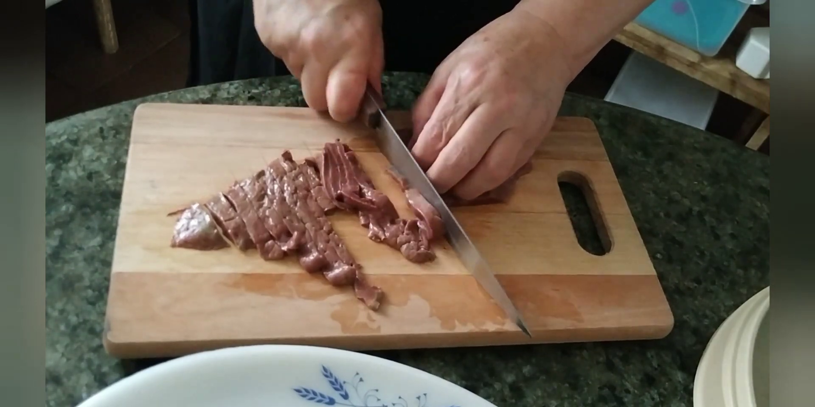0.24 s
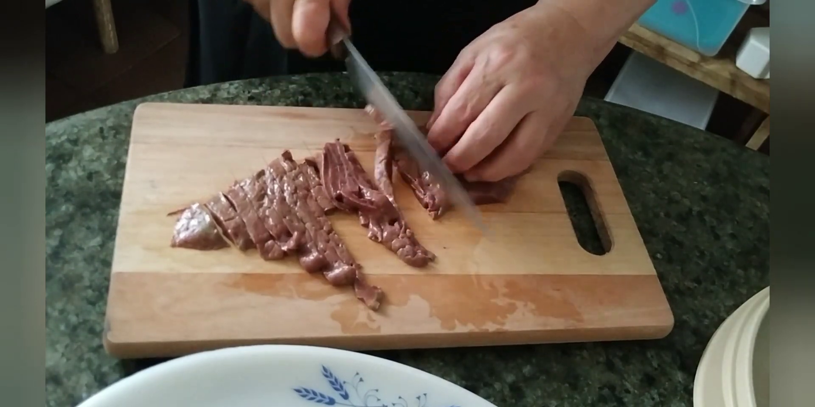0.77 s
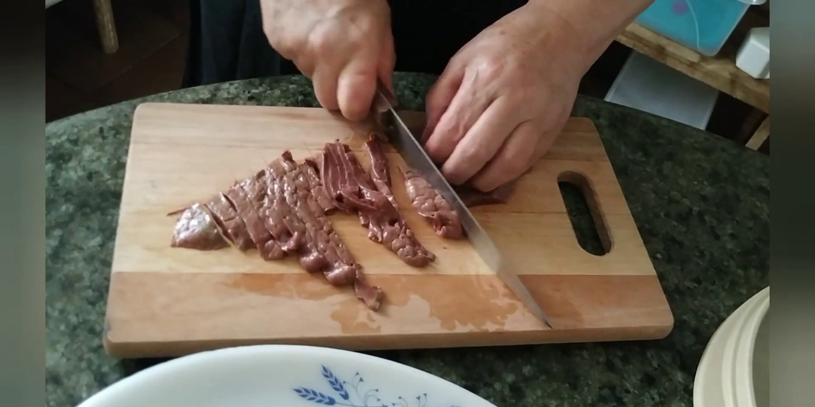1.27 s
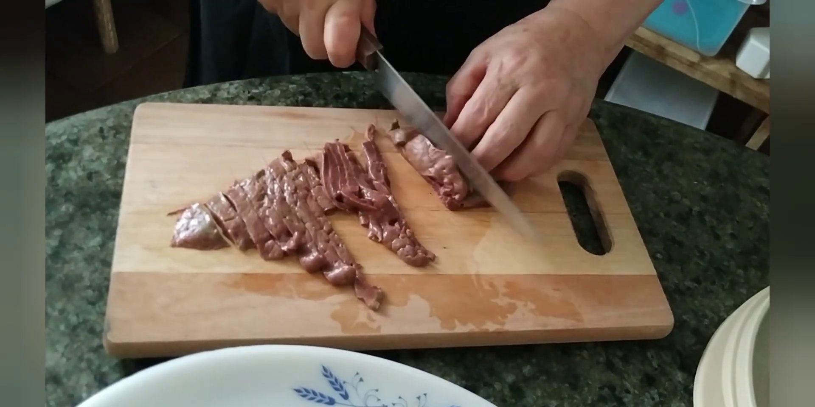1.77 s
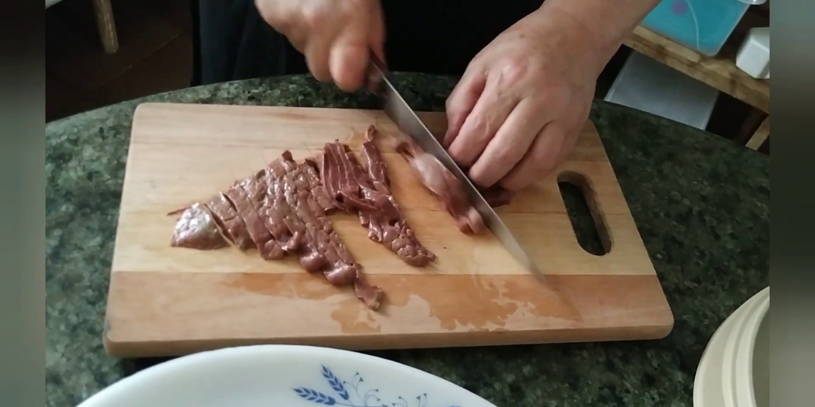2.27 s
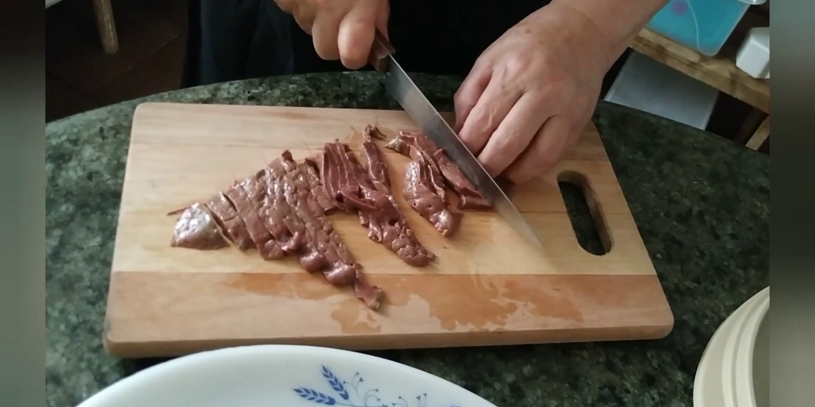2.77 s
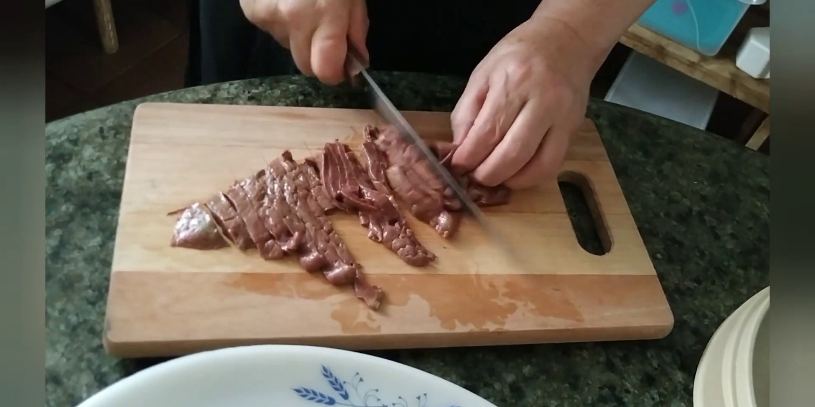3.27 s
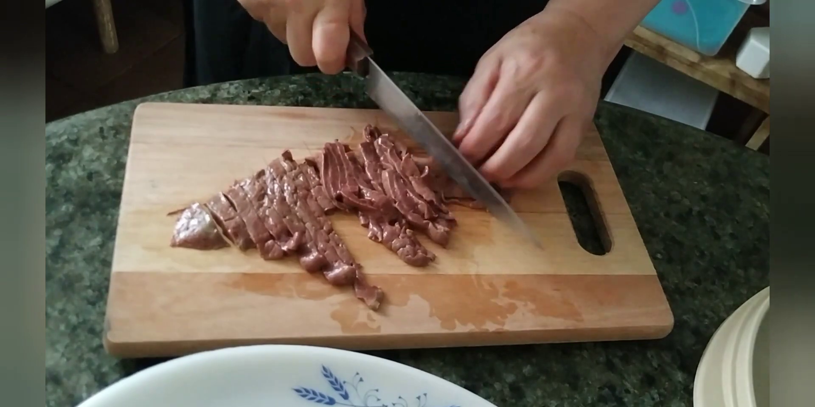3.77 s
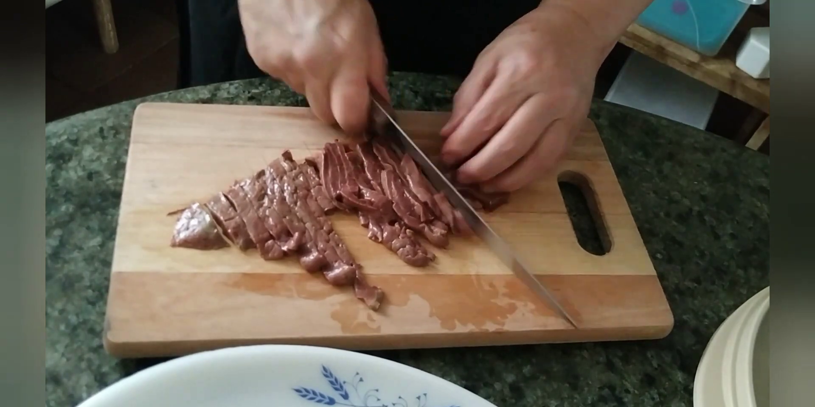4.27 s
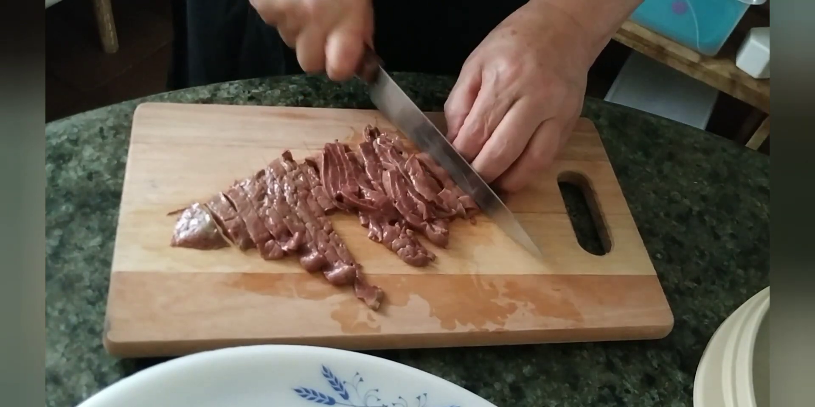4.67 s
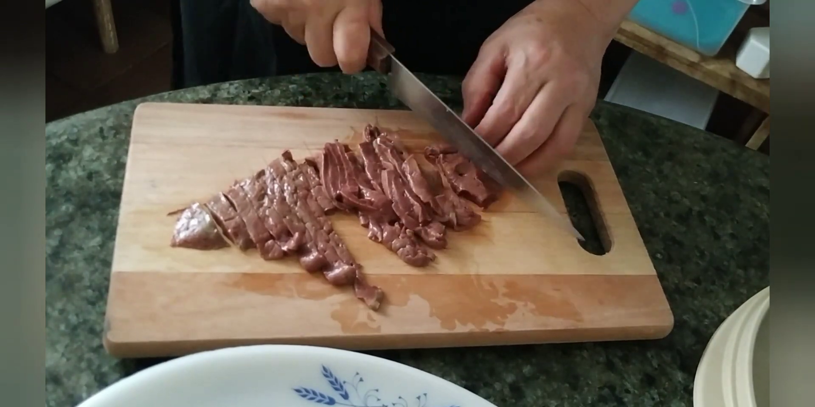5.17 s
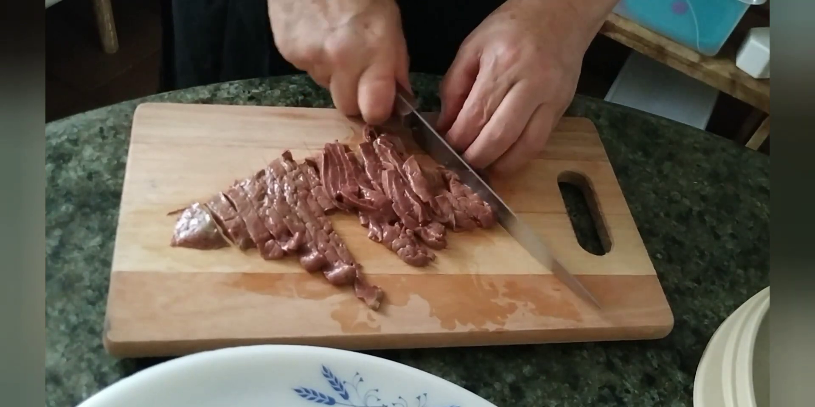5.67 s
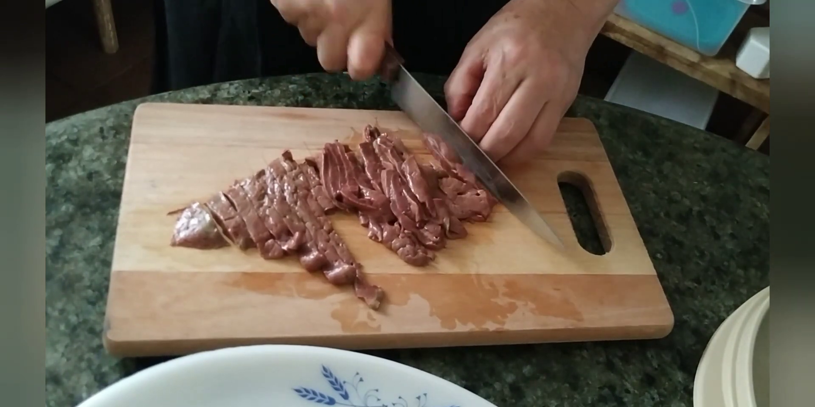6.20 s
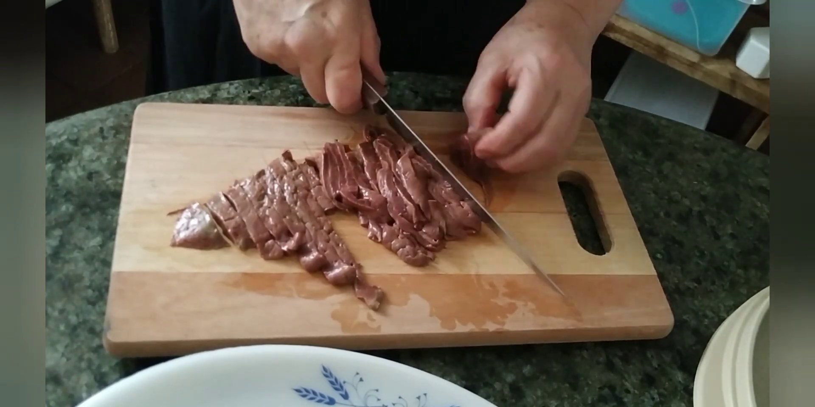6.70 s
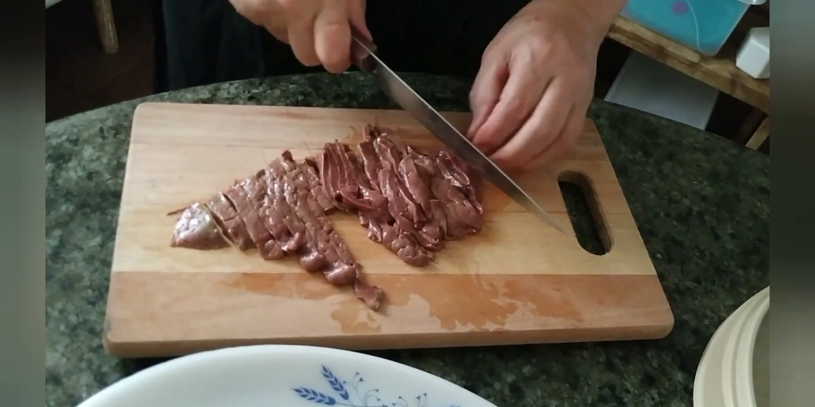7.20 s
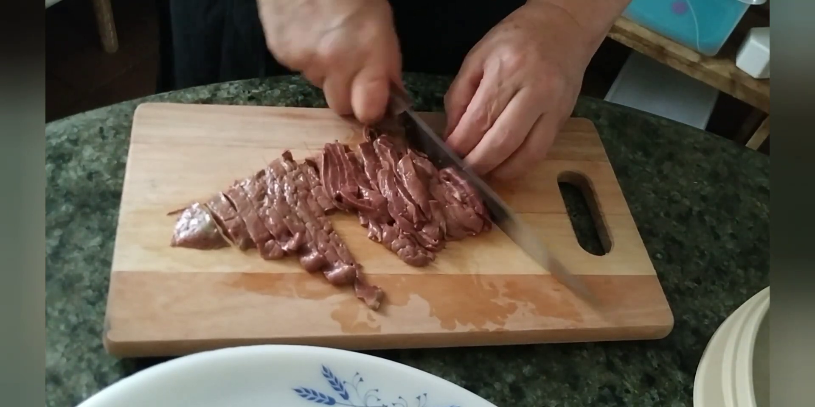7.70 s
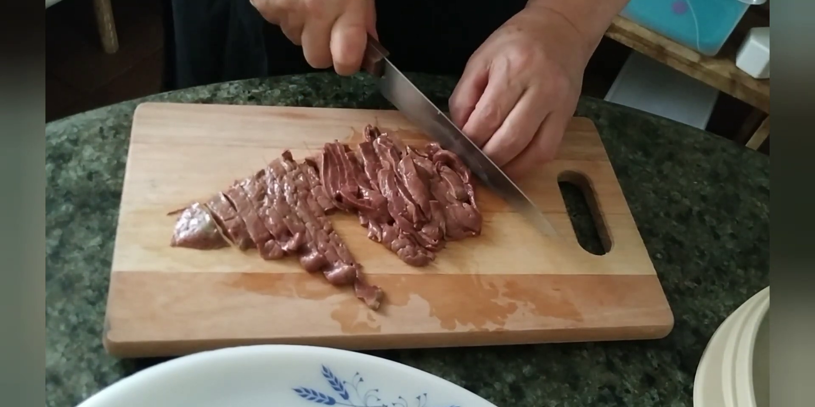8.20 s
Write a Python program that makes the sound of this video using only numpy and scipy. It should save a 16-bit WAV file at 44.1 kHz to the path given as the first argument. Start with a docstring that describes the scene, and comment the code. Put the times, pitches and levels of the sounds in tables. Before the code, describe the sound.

Irregular slicing, about three strokes a second, heard from half a metre: hissing metal edge, coarse rubbing on wood, dull cushioned thuds with a low table shudder. A clear knock comes about one second in, a louder one past the middle, and another crisp one at the end. Small wet clicks dot the gaps. Short dull kitchen reverberation, wavering appliance hum and soft background hiss surround it.

```python
"""Slicing meat on a wooden board

A kitchen knife slices raw meat on a wooden board lying on a stone table, half a metre below a phone.
The sliding edge sheds noisy hiss and its coarse catches grind through the board's modes; the blade knocks
the board or lands softly, and the table shudders on its own modes; short bright ticks and soft rustles are noise.
A small hard kitchen answers by convolution, over an appliance's wavering tones, rumble and faint hiss."""
import sys
import numpy as np
from scipy import signal
from scipy.fft import rfft, irfft, next_fast_len
from scipy.io import wavfile
from scipy.ndimage import uniform_filter1d

SR = 44100
rng = np.random.default_rng(int(sys.argv[2]) if len(sys.argv) > 2 else 0)


def decibels_to_gain(level_db):
    """Convert a level in decibels to a linear amplitude gain (20 dB per decade)."""
    exponent = np.asarray(level_db, float) / 20
    return 10 ** exponent


def put_to_file(sound):
    """Save the sound as 16-bit audio at rate SR, in the file named by the first command-line argument."""
    columns = np.atleast_2d(sound).T  # one column per channel
    safe = np.clip(columns, -1, 1)
    whole_steps = np.round(safe * 32767)
    wavfile.write(sys.argv[1], SR, whole_steps.astype(np.int16))


N = 372644
TIME = np.arange(N) / SR

# All levels are relative unless a function scales its signal to rms 1 first.
# blade on board: start_s, blow_db, contact_ms, edge_tick_db, table_shudder_db
KNOCKS = [(0.937, -19.5, 1.0, -30, -50), (1.8585, -32, 0.6, -23, -50.5), (2.692, -41, 0.5, -33, -80),
          (4.539, -12.3, 0.7, -26, -56), (5.311, -44, 0.4, -46, -70), (5.328, -42, 0.3, -43, -59),
          (6.338, -44, 0.5, -35, -61), (7.369, -30, 0.55, -34, -67), (8.163, -43, 0.3, -35, -66),
          (8.185, -15.3, 0.24, -21, -55)]
# blade landing softly through the meat: start_s, level_db, rise_ms, cushion_corner_hz, table_shudder_db
LANDINGS = [(0.086, -74, 3.8, 1200, -58.5), (0.327, -44.5, 33.5, 513, -65), (0.885, -57.5, 56, 700, -80),
            (1.336, -61, 16.5, 596, -65), (1.800, -52.5, 56, 980, -68), (2.215, -51.5, 24.5, 525, -62),
            (2.640, -55, 59, 710, -83), (2.685, -41.5, 4.4, 690, -52.5), (3.060, -56, 19, 544, -75),
            (3.818, -54, 17, 840, -60), (4.083, -70.5, 11, 1400, -61), (4.51, -59, 23, 940, -63.5),
            (4.772, -51, 7, 720, -80.5), (5.270, -55.5, 59, 1050, -71), (5.530, -55.5, 22.3, 903, -67),
            (5.995, -62, 25, 910, -58), (6.030, -52.5, 48, 885, -50.5), (6.320, -50.5, 19, 926, -76.5),
            (6.766, -73, 7.2, 1300, -55.5), (6.793, -71.5, 10, 1300, -64), (7.303, -50.5, 69, 920, -53),
            (7.558, -69.5, 2.3, 2010, -56), (7.603, -71, 5.8, 1190, -68), (8.135, -61, 8, 1000, -56.5)]
# short bright ticks, wet meat letting go or small contacts of the blade: start_s, level_db, lowest_hz
TICKS = [(0.085, -37, 900), (0.5103, -40, 8000), (1.7345, -33, 1870), (2.534, -38.5, 4330),
         (3.705, -38.5, 9180), (4.318, -40, 6100), (5.8835, -45, 6780), (7.559, -40, 900),
         (7.651, -37, 3800), (8.410, -44, 3000)]
# fingers shifting on the wet meat: centre_s, length_s, level_db, centre_hz
RUSTLES = [(5.02, 0.084, -63, 3700), (5.18, 0.09, -62, 3600), (5.71, 0.1, -55, 3870)]
# each slide of the edge: fastest_s, speeding_up_s, slowing_down_s, hiss_db, grind_db, tilt_db_per_octave
STROKES = [(0.005, 0.044, 0.074, -56, -67, -0.5), (0.19, 0.111, 0.14, -54, -56.5, 1.5),
           (0.363, 0.046, 0.066, -48.5, -50, -0.6), (0.947, 0.098, 0.19, -50, -53.5, 0.4),
           (1.23, 0.089, 0.11, -55, -55.5, 1.5), (1.364, 0.03, 0.056, -50, -60, 1.5),
           (1.86, 0.063, 0.11, -42.5, -77, -0.3), (2.1, 0.095, 0.12, -76, -63, 4),
           (2.24, 0.21, 0.11, -54.5, -61.5, 1.5), (2.697, 0.059, 0.16, -47.5, -52, 0.3),
           (2.971, 0.083, 0.14, -51, -53, 1.5), (3.101, 0.059, 0.092, -47, -54.5, 2.3),
           (3.852, 0.058, 0.12, -48.5, -50.5, -1.7), (3.97, 0.1, 0.11, -56.5, -56.5, 3),
           (4.095, 0.01, 0.05, -57, -76, 1), (4.55, 0.04, 0.2, -49, -64, -0.2),
           (4.787, 0.018, 0.041, -45.5, -47, -0.5), (5.334, 0.091, 0.15, -48, -61, -0.6),
           (5.554, 0.021, 0.041, -50.5, -57, -1), (6.08, 0.096, 0.13, -46.5, -59.5, -0.8),
           (6.343, 0.046, 0.08, -50, -48, -1), (6.8, 0.054, 0.047, -61.5, -86, -3),
           (7.368, 0.077, 0.14, -45, -66, -0.6), (7.609, 0.019, 0.043, -56, -73, 0),
           (8.18, 0.06, 0.1, -46, -54, -0.1), (8.414, 0.005, 0.045, -47.5, -62.5, 0.8)]
# modes of the board: pitch_hz, level_db, t60_s
BOARD_MODES = [(325, -26, .2), (380, -19, .05), (585, -20, .06), (640, -13, .07), (830, -17, .09),
               (720, -17, .05), (1040, -17, .05), (1215, -17, .05), (1600, -17, .04), (1780, -16, .03),
               (850, 7, .012), (1550, 4.5, .009), (2250, 0, .005)]
# how well the board radiates: frequency_hz, gain_db
RADIATION = [(100, -37.5), (280, -41.5), (330, 1), (480, -5.5), (620, 4.5), (2450, 8), (2900, -1.5)]
# modes of the table on its legs: pitch_hz, level_db, t60_s
TABLE_MODES = [(46.47, 9, 0.72), (115, 5.5, 0.047), (146, 7, 0.14)]
# spectrum of the edge: frequency_hz, density_db (per Hz)
EDGE_SPECTRUM = [(880, -21), (1500, -7), (1770, 4), (2580, 0.5), (3180, 1.5), (5250, 0), (6270, -0.5),
                 (7950, -4), (14800, -5.5), (15900, -25)]
# appliance hum, wavering: time_s, lower_tone_db, upper_tone_db
HUM_LEVELS = [(0.0, -70, -77), (0.14, -64, -58.5), (2.14, -57, -59.5), (2.4, -75, -74), (2.77, -65, -57),
              (3.11, -80, -65), (3.65, -67, -54), (4.07, -55.5, -69), (5.22, -65.5, -56.5),
              (5.72, -59, -63), (6.07, -60, -52), (6.52, -55, -70), (6.82, -58.5, -57),
              (7.29, -62.5, -63.5), (7.371, -58, -55.5), (8.02, -77, -62), (8.21, -46, -50.5),
              (8.45, -84, -64)]
# mean pitch of the two hum tones: pitch_hz
HUM_PITCHES = [86.5, 119]
# fainter tones of the hum: pitch_hz, level_db
FAINT_TONES = [(145, -76.5), (240, -74.5), (300, -79.5), (440, -79.5), (530, -81.5)]
# spectrum of the background noise: frequency_hz, density_db (per Hz)
AIR_SPECTRUM = [(14, -7), (24, 18.5), (53, -7.5), (123, -4.5), (148, -6.5), (242, -11), (464, -20.5),
                (517, -19.5), (777, -36), (4300, -38.5), (9990, -42), (15900, -44)]
# background as it swells and dips: time_s, rumble_db, drone_db, hiss_db
BACKGROUND_LEVELS = [(0.0, -48.5, -70, -60), (1.55, -51, -71, -61.5), (1.93, -46, -55, -58.5),
                     (2.35, -52, -63.5, -65), (2.48, -59, -77, -68), (2.62, -50, -64.5, -62),
                     (4.0, -50, -64, -61), (6.35, -47, -64, -59.5), (6.97, -54.5, -83, -63),
                     (7.44, -43, -56.5, -60), (7.93, -53.5, -64, -62), (8.45, -43.5, -81, -60)]
# thin noisy band of the appliance, a single row: centre_hz, width_hz, level_db
WHINE_BAND = (4370, 220, -80)
# level difference of the ports: frequency_hz, left_minus_right_db
LEFT_LOUDER = [(100, 0), (700, 0), (2000, -1), (5000, 0.5), (12000, 8)]


def curves(table):
    """Linear interpolation: the columns of a time table at every sample."""
    s, *columns = np.transpose(table)
    return [np.interp(TIME, s, c) for c in columns]


def unit(x):
    """Normalisation: scale to rms 1."""
    return x / np.sqrt(np.mean(x ** 2))


def colour(x, points, lag_ms=0.):
    """Linear filtering: gain by (Hz, dB) points, and a delay as linear phase."""
    size = next_fast_len(N)
    hz = np.fft.rfftfreq(size, 1 / SR)
    f, db = np.transpose(points)
    gain = decibels_to_gain(np.interp(np.log(hz + 1), np.log(f), db))
    delay = np.exp(-2j * np.pi * hz * lag_ms / 1000)
    return irfft(rfft(x, size) * gain * delay, size)[:N]


def band(x, lo_hz, hi_hz):
    """Band limitation: a gentle Butterworth band-pass."""
    sos = signal.butter(2, [lo_hz, min(hi_hz, .45 * SR)], "bandpass", fs=SR, output="sos")
    return signal.sosfilt(sos, x)


def dull(x, hz):
    """Loss of treble: a two-pole low-pass."""
    return signal.lfilter(*signal.butter(2, hz, fs=SR), x)


def ring(force, modes):
    """Modal resonance: a force drives decaying sines, one complex pole each."""
    out = 0
    for hz, db, t60 in modes:
        pole = np.exp(2j * np.pi * hz / SR - np.log(1000) / (t60 * SR))
        out = out + decibels_to_gain(db) * signal.lfilter([1], [1, -pole], force).imag
    return out


def walk(rate):
    """Slow random modulation: levels held for 1 / rate s, smoothed twice, spread near 1."""
    step = 16
    hold = int(SR / step / rate)
    coarse = np.repeat(rng.standard_normal(N // (hold * step) + 2), hold)
    smooth = uniform_filter1d(uniform_filter1d(coarse, hold), hold)
    return 1.41 * np.interp(np.arange(N) / step, np.arange(len(coarse)), smooth)


def grit(rate, spread_db):
    """Stick-slip of fibres: random clicks, rate per second, with a few large ones; rms 1."""
    sizes = decibels_to_gain(spread_db * rng.exponential(size=N)) * rng.standard_normal(N)
    return unit(sizes * (rng.random(N) < rate / SR))


def burst(t60):
    """Impulsive release: exponentially decaying noise, peak near 1."""
    t = np.arange(2048) / SR
    return rng.standard_normal(2048) * np.exp(-np.log(1000) * t / t60) / 2


def streaks(x, db, tilt_db):
    """Spectral fluctuation: narrow bands last some 70 ms; a tilt about 5 kHz, held below 1 kHz."""
    hz, s, z = signal.stft(x, SR, nperseg=512)
    field = rng.standard_normal(z.shape[1:])
    field = uniform_filter1d(field, size=3, axis=0)
    field = uniform_filter1d(field, size=12, axis=1)
    octaves = np.log2(np.maximum(hz, 1000)[:, None] / 5000)
    tilt = octaves * np.interp(s, TIME, tilt_db)
    return signal.istft(z * decibels_to_gain(db * unit(field) + tilt), SR)[1][:, :N]


def add(track, s, piece):
    """Superposition: mix a piece in at a time."""
    i = int(s * SR)
    track[i:i + len(piece)] += piece[:N - i]


def hum():
    """Frequency modulation: two low tones wander in pitch; fainter ones keep theirs and waver in level."""
    out = np.zeros(N)
    for mean_hz, db in zip(HUM_PITCHES, curves(HUM_LEVELS)):
        hz = mean_hz * (1 + 0.01806 * walk(4.3))
        phase = 2 * np.pi * np.cumsum(hz) / SR
        out += np.sqrt(2) * np.sin(phase) * decibels_to_gain(db + 2.3 * walk(10.0))
    for hz, db in FAINT_TONES:
        out += np.sqrt(2) * np.sin(2 * np.pi * hz * TIME) * decibels_to_gain(db + 2.2 * walk(1.6))
    return out


def background():
    """Coherence between ports: rumble partly alike, drone shared, hiss and a thin band unrelated."""
    rumble_db, drone_db, hiss_db = curves(BACKGROUND_LEVELS)
    mid, left, right = (colour(rng.standard_normal(N), AIR_SPECTRUM) for _ in range(3))
    sides = np.array([left, right])
    low, high = (signal.butter(2, 600, kind, fs=SR, output="sos") for kind in ("lowpass", "highpass"))
    rumble = unit(signal.sosfilt(low, mid + 0.73 * sides)) * decibels_to_gain(rumble_db + 1.5 * walk(16.0))
    drone = band(band(rng.standard_normal(N), 150, 227.4), 150, 227.4)
    drone = unit(drone) * decibels_to_gain(drone_db + 0.58 * walk(5.9))
    hiss = streaks(signal.sosfilt(high, sides), 5.1, 0 * TIME)
    hiss = unit(hiss) * decibels_to_gain(hiss_db + 1.0 * walk(12.0))
    hz, width, db = WHINE_BAND
    whine = unit(band(rng.standard_normal((2, N)), hz - width / 2, hz + width / 2)) * decibels_to_gain(db)
    return rumble + drone + hiss + whine


def kitchen(x):
    """Reverberation: dense dull reflections decay after a short gap, partly alike at both ports."""
    t60_s, level_db, top_hz = 0.37, -13, 3560
    gap_ms, wall_ms, wall_db = 4, 6.9, -15.5
    t = np.arange(SR // 2) / SR
    shared, left, right = rng.standard_normal((3, len(t))) * np.exp(-np.log(1000) * t / t60_s)
    onset = np.clip(t * 1000 / gap_ms - 1, 0, 1)
    tails = np.array([shared + 1.8 * left, shared + 1.8 * right]) * onset
    tails = signal.lfilter(*signal.butter(1, top_hz, fs=SR), tails)
    tails = tails * decibels_to_gain(level_db) / np.sqrt(np.sum(tails ** 2) / 2)
    tails[:, int(wall_ms * SR / 1000)] += decibels_to_gain(wall_db)  # one near wall stands out
    return signal.fftconvolve(x[None], tails, axes=1)[:, :N]


def ticks_and_rustles():
    """Band-limited noise: short bright ticks decay at once, soft rustles swell and fade."""
    out = np.zeros(N)
    for s, db, hz in TICKS:
        add(out, s, decibels_to_gain(db) * band(burst(t60=0.017), hz, 7.3 * hz))
    for s, length, db, hz in RUSTLES:
        swell = np.hanning(int(length * SR))
        noise = unit(band(rng.standard_normal(len(swell)), hz / 1.26, hz * 1.37))
        add(out, s - length / 2, decibels_to_gain(db) * swell * noise)
    return out


def board(force, roam_db, lag_ms):
    """Plate radiation: successive modes move the air in opposite senses; a small plate sends little bass.
    A contact that roams over the wood favours now one mode, now another."""
    sound = 0
    for i, mode in enumerate(BOARD_MODES):
        roaming = force * decibels_to_gain(roam_db * walk(5.9))
        sound = sound + (-1.) ** i * ring(roaming, [mode])
    return colour(sound, RADIATION, lag_ms)


def landing(rise_ms, cushion_hz):
    """Cushioned impact: a first touch, then many small pushes that swell and fade."""
    first_touch = 0.2  # share of the full push at first contact
    fade_ms = 11.3
    bare_share = 0.19  # the edge meeting bare wood, uncushioned
    t_ms = np.arange(8192) * 1000 / SR
    growth = first_touch + (1 - first_touch) * (t_ms / rise_ms) ** 3
    swell = np.where(t_ms < rise_ms, growth, np.exp((rise_ms - t_ms) / fade_ms))
    chatter = swell * rng.standard_normal(len(t_ms)) * (rng.random(len(t_ms)) < .2)
    return dull(chatter, cushion_hz) + bare_share * chatter


def knocks():
    """Impact excitation: short pushes ring the board, the edge ticks, and impulses rock the table."""
    push, skid, tick, shove = np.zeros((4, N))
    t_ms = np.arange(8192) * 1000 / SR
    for s, blow_db, contact_ms, tick_db, table_db in KNOCKS:
        shape = np.sin(np.pi * np.clip(t_ms / contact_ms, 0, 1)) ** 2
        add(push, s, decibels_to_gain(blow_db) * shape / shape.sum())
        add(tick, s, decibels_to_gain(tick_db) * burst(t60=0.016))
        add(shove, s, decibels_to_gain(table_db) * np.ones(1))
    for s, skid_db, rise_ms, cushion_hz, table_db in LANDINGS:
        add(skid, s, decibels_to_gain(skid_db) * landing(rise_ms, cushion_hz))
        add(shove, s, decibels_to_gain(table_db) * np.ones(1))
    blows = board(push, 0.8, 2.2)
    landings = board(skid, 1.5, 0)
    # blows also reach the table top through the board, all but its lowest mode
    thud = decibels_to_gain(-34.0) * ring(push, TABLE_MODES[1:])
    return blows + landings, colour(tick, EDGE_SPECTRUM), ring(shove, TABLE_MODES) + thud


def edge(tilt_db):
    """Extended source: dense fine catches and sparse wet crackles, drawn independently for each port."""
    ports = []
    for _ in range(2):
        catches = grit(rate=11000., spread_db=1.4) + decibels_to_gain(-13.5) * grit(rate=400., spread_db=1.0)
        ports.append(colour(catches, EDGE_SPECTRUM))
    return streaks(unit(np.array(ports)), 4.17, tilt_db)


def strokes():
    """Speed and pressure as controls: hiss peaks with the speed, grind follows an arch of pressure."""
    bite_db, bite_ms = 12.5, 6.7  # the edge bites in this far below its peak hiss, over this ramp
    fade_db, point = 18, 1.2  # hiss lost after the slowing-down time; point 1 = sharp peak, 2 = round
    press_stretch, press_shape = 0.69, 0.91  # share of the slowing down under pressure; power of the arch
    rest_db = -82  # constant floor of faint mid-frequency noise between the slides
    speed, tilt, pressure = np.full(N, 1e-9), np.zeros(N), np.full(N, decibels_to_gain(rest_db))
    for s, rise, fall, hiss_db, grind_db, tilt_db in STROKES:
        near = slice(max(int((s - 1 / 2) * SR), 0), int((s + 1) * SR))
        t = TIME[near] - s
        lost_db = np.where(t < 0, bite_db * -t / rise, fade_db * np.abs(t / fall) ** point)
        onset = np.clip((t + rise) * 1000 / bite_ms + 1 / 2, 0, 1)
        gain = decibels_to_gain(hiss_db - lost_db) * onset
        speed[near] += gain
        tilt[near] += gain * tilt_db
        part = np.clip((t + rise) / (rise + press_stretch * fall), 0, 1)
        pressure[near] += decibels_to_gain(grind_db) * np.abs(np.sin(np.pi * part)) ** press_shape
    return speed, tilt / speed, pressure  # tilt averaged by gain


def slide():
    """Friction: coarse catches shake the board, fine ones hiss off the edge."""
    speed, tilt_db, pressure = strokes()
    catches = dull(grit(rate=2500., spread_db=1.8), 1600)  # meat under the edge dulls the catches
    grind = unit(board(catches, 2.5, 0))
    grind = grind * pressure * decibels_to_gain(2.0 * walk(60.))
    flicker = speed * decibels_to_gain(1.6 * walk(30.0) + 0.89 * walk(200.))
    return grind, edge(tilt_db) * flicker


def scene():
    """Time and level differences: the board reaches the right port first; the phone's body tilts treble left."""
    grind, hiss = slide()
    blow, tick, shudder = knocks()
    near = grind + blow + tick + ticks_and_rustles()
    left_points = [(hz, db / 2) for hz, db in LEFT_LOUDER]
    right_points = [(hz, -db / 2) for hz, db in LEFT_LOUDER]
    left = colour(near + hiss[0], left_points, lag_ms=0.073)
    right = colour(near + hiss[1], right_points)
    return np.array([left, right]) + kitchen(near + hiss[0]) + shudder + hum() + background()


def roll_off(x):
    """The treble ends steeply here."""
    return signal.sosfilt(signal.butter(12, 15790, fs=SR, output="sos"), x)


def record(dry):
    """Band limits: a high-pass removes the deepest bass, a steep low-pass the top."""
    bass_cut = signal.butter(6, 40, "highpass", fs=SR, output="sos")
    top_cut = signal.ellip(8, .2, 70, 15620, fs=SR, output="sos")
    mix = signal.sosfilt(top_cut, signal.sosfilt(bass_cut, dry))
    return roll_off(mix)


dry = scene()
out = record(dry)
put_to_file(out)
```